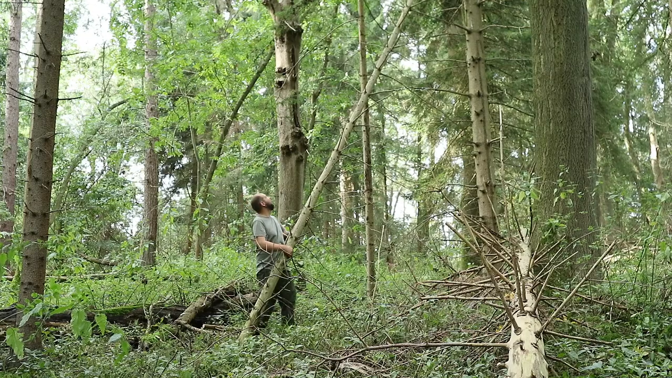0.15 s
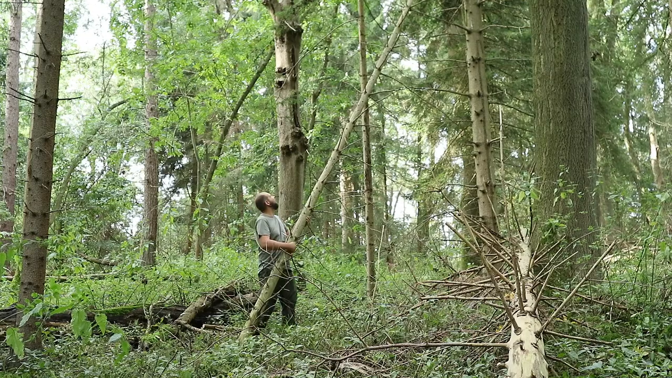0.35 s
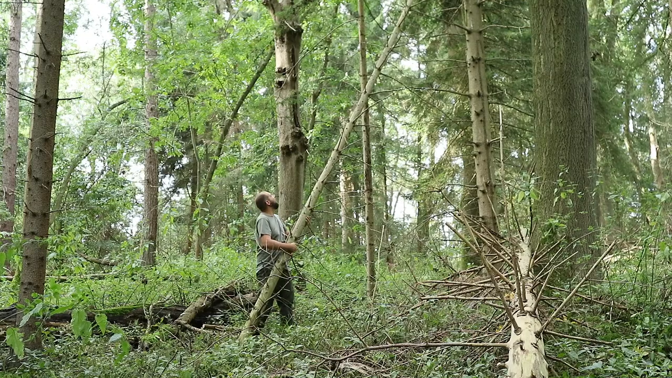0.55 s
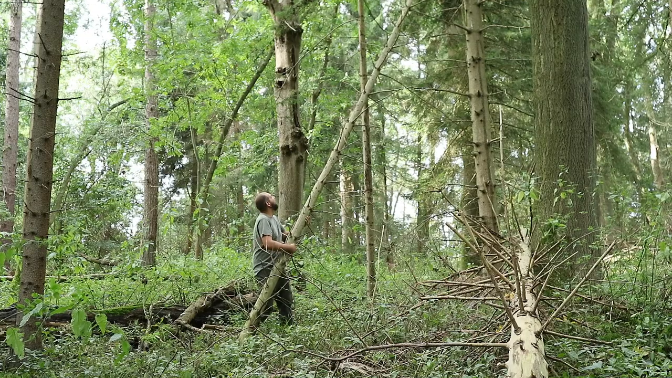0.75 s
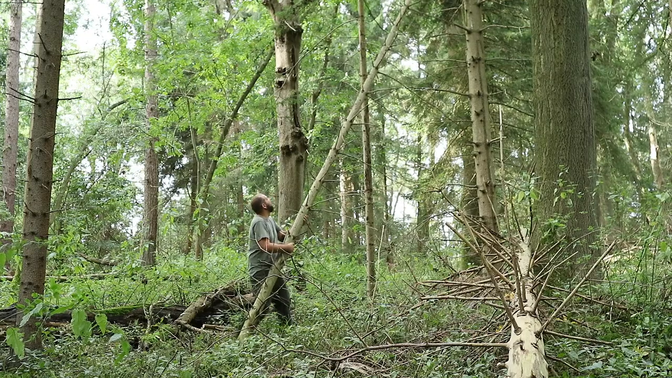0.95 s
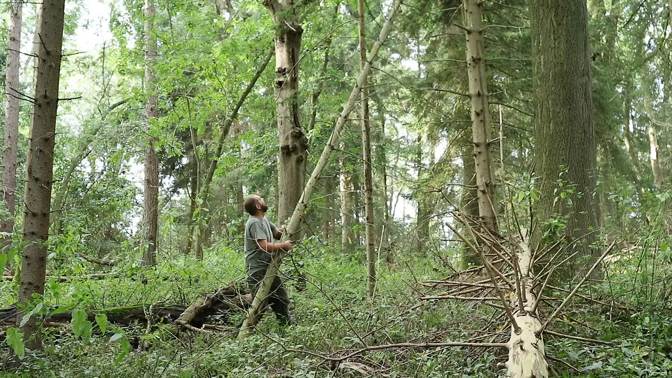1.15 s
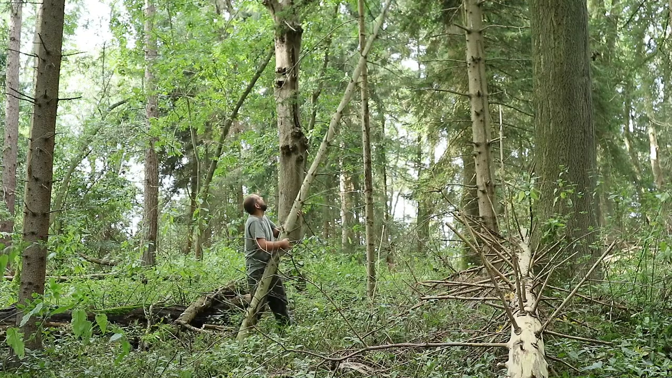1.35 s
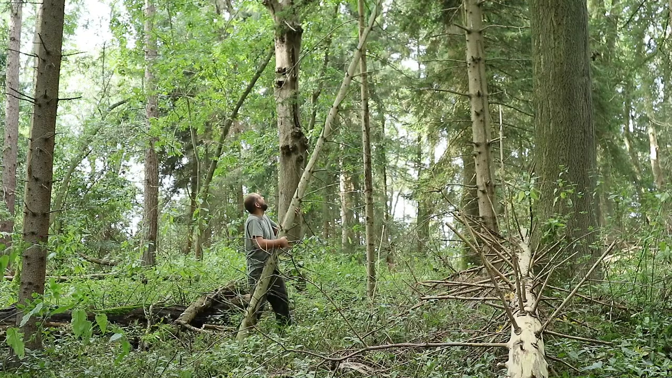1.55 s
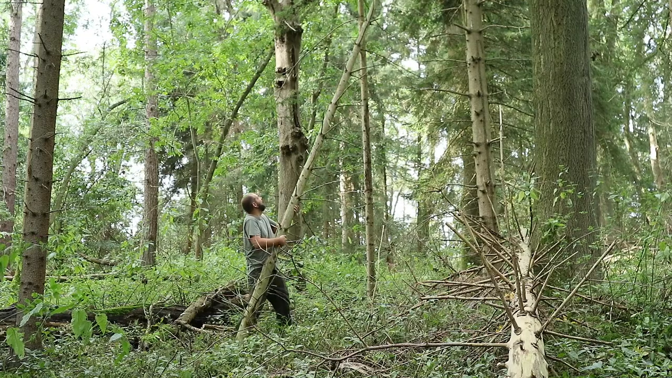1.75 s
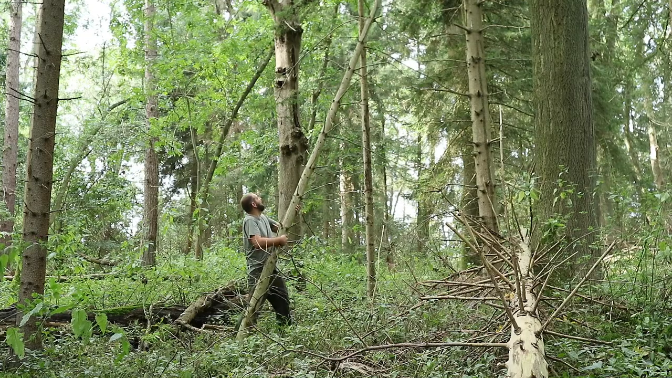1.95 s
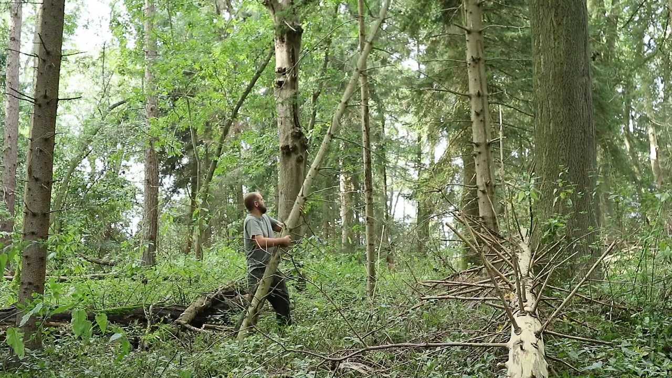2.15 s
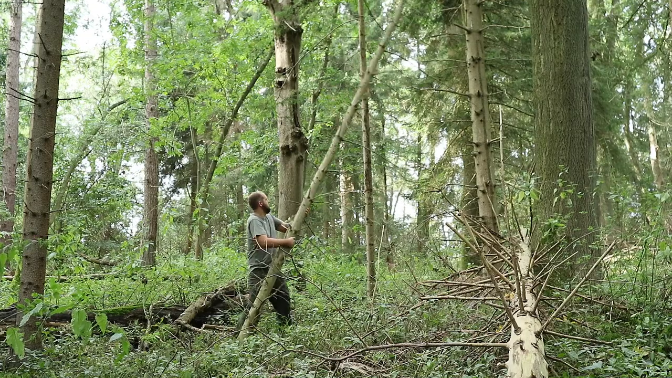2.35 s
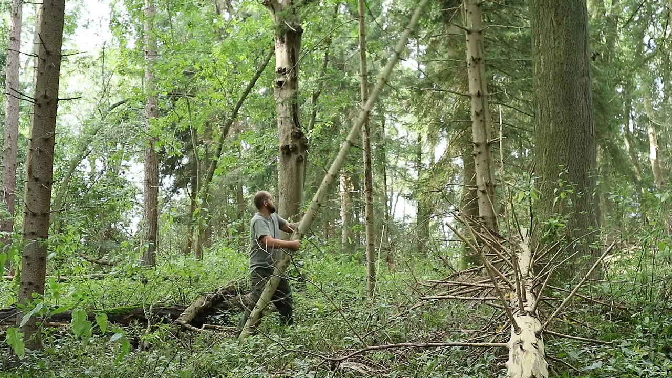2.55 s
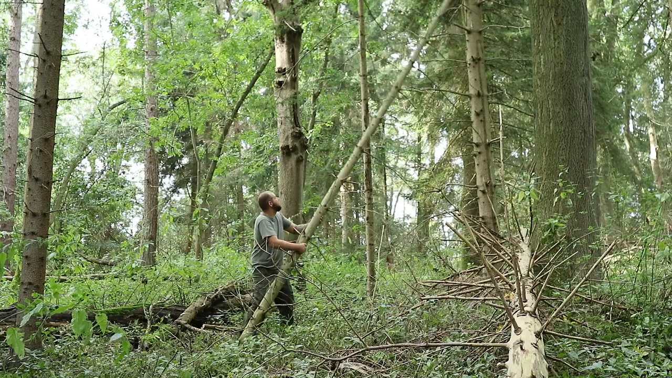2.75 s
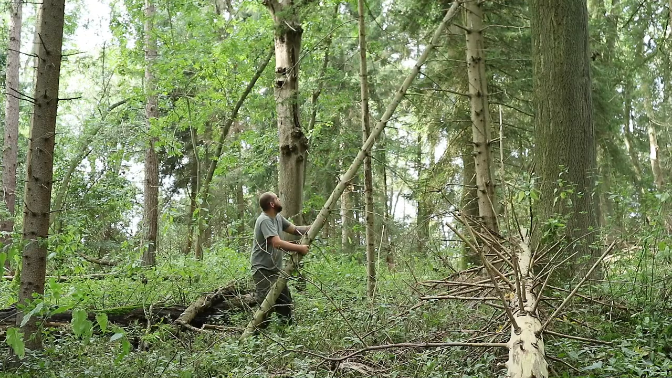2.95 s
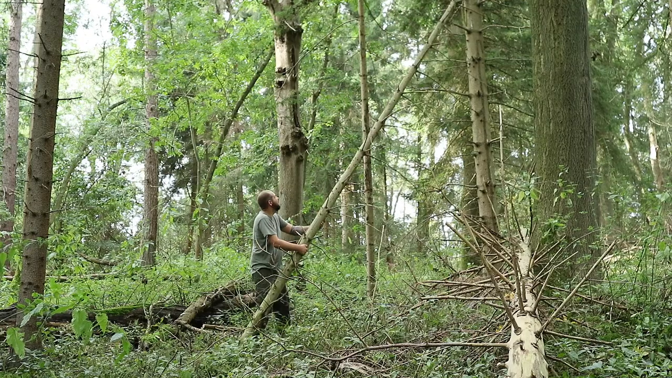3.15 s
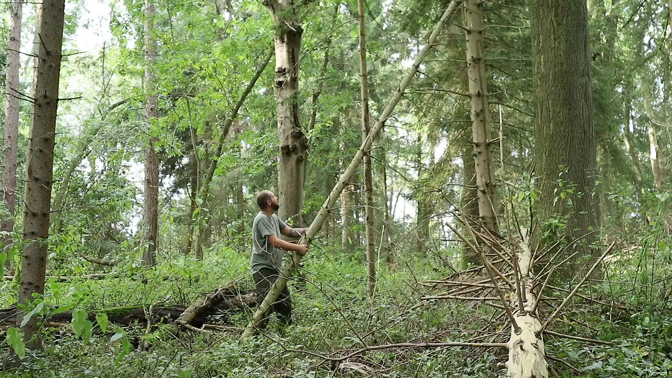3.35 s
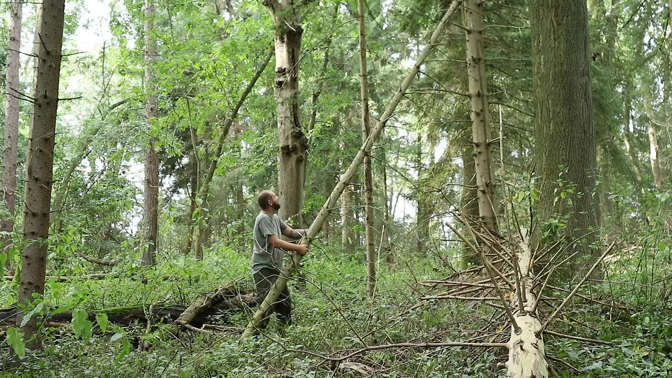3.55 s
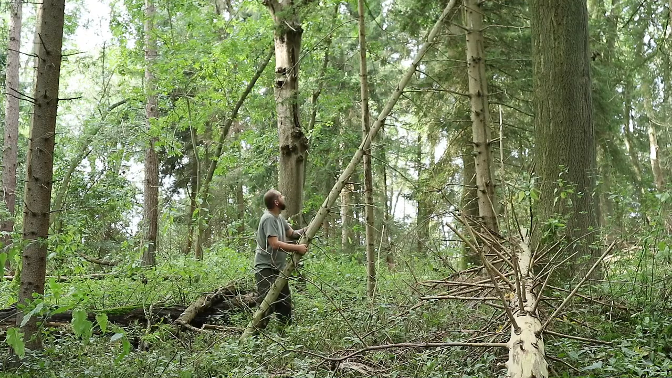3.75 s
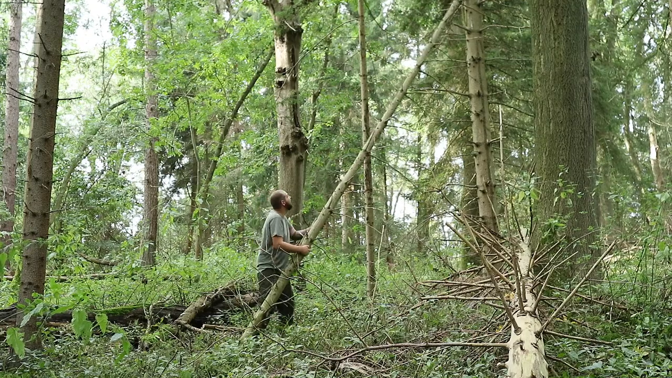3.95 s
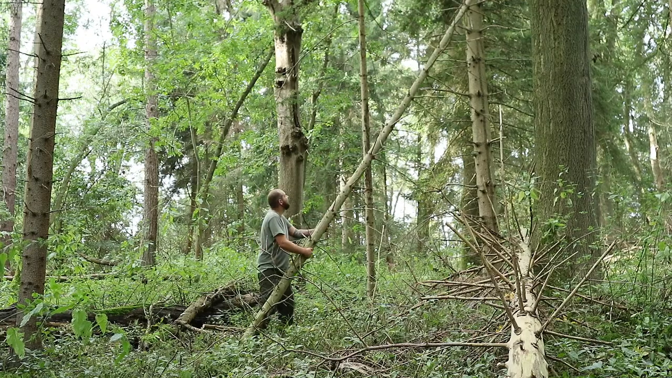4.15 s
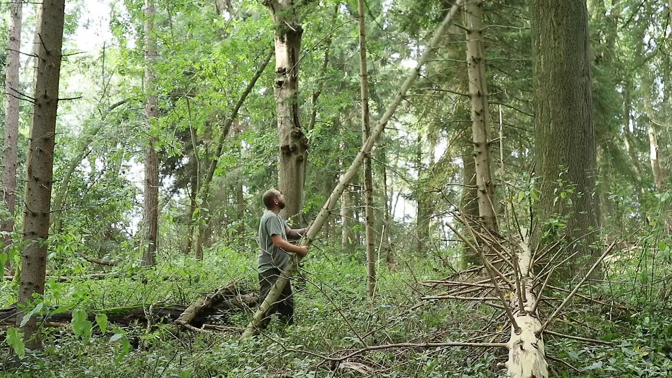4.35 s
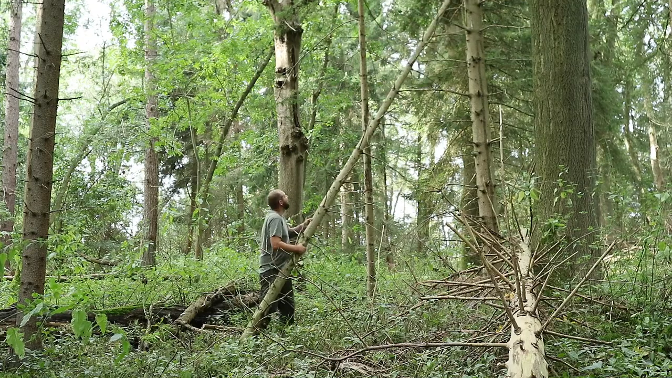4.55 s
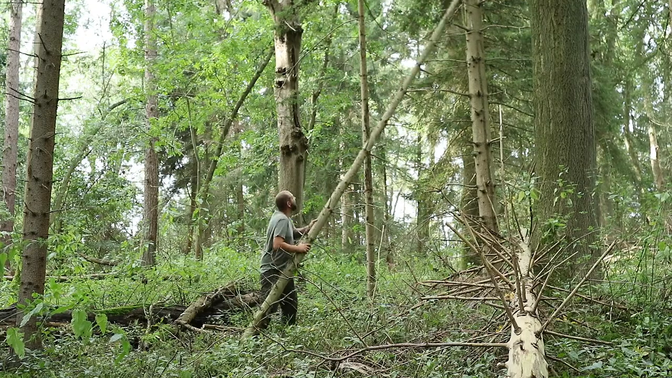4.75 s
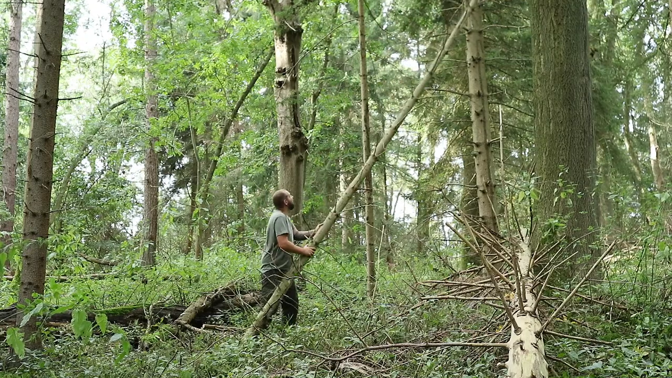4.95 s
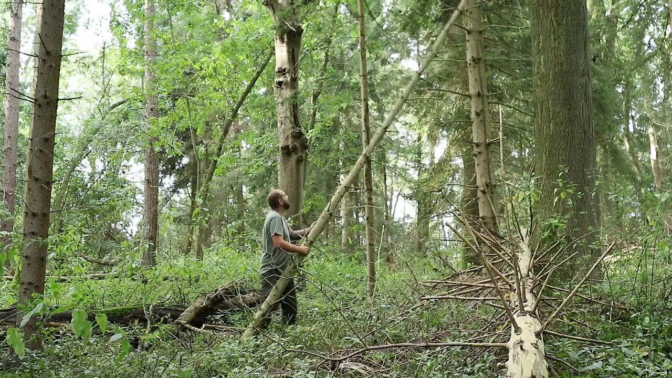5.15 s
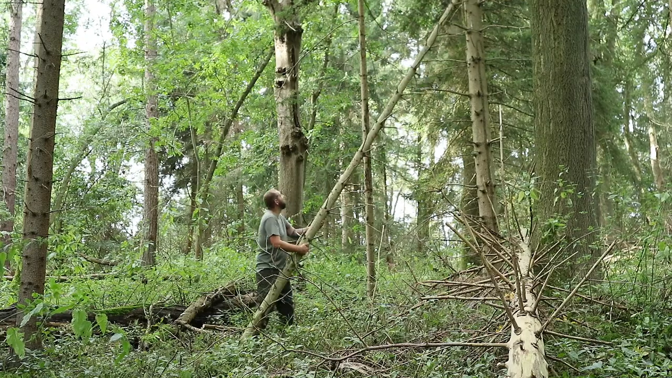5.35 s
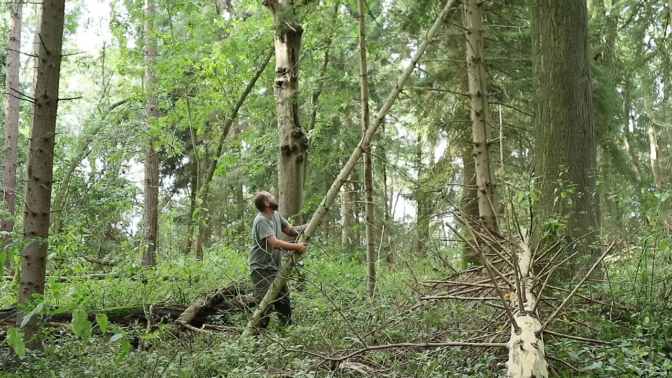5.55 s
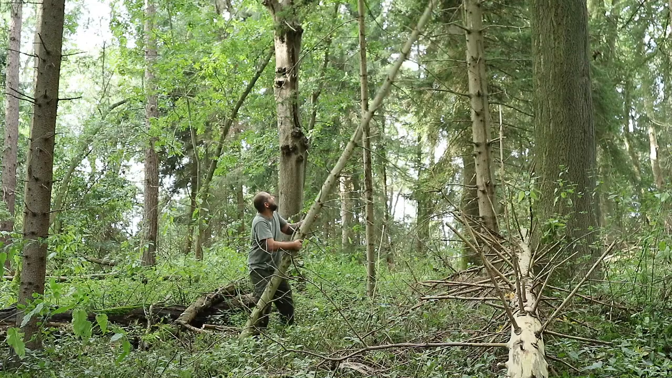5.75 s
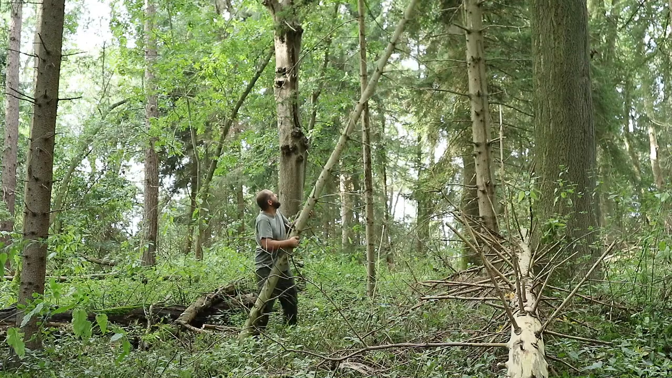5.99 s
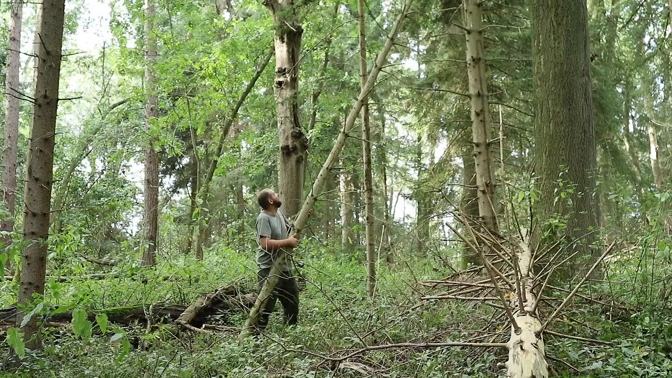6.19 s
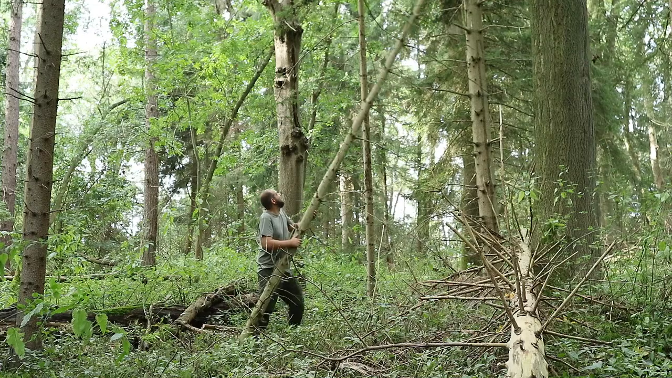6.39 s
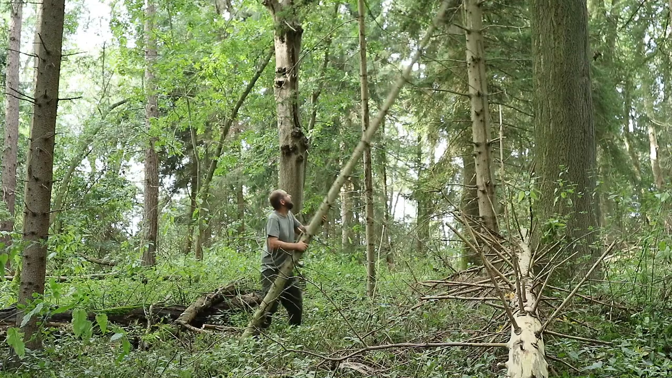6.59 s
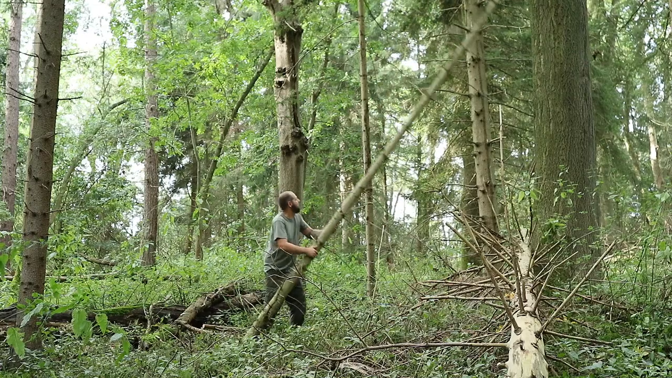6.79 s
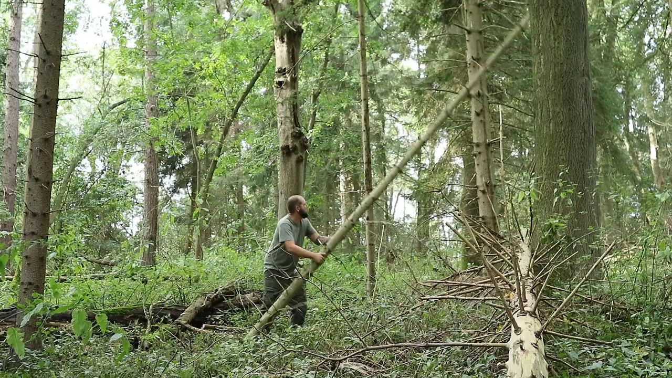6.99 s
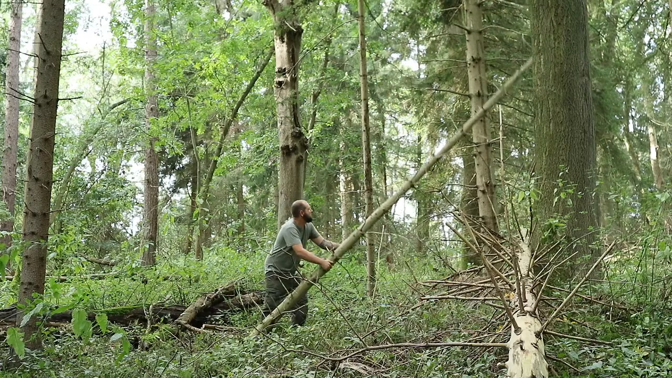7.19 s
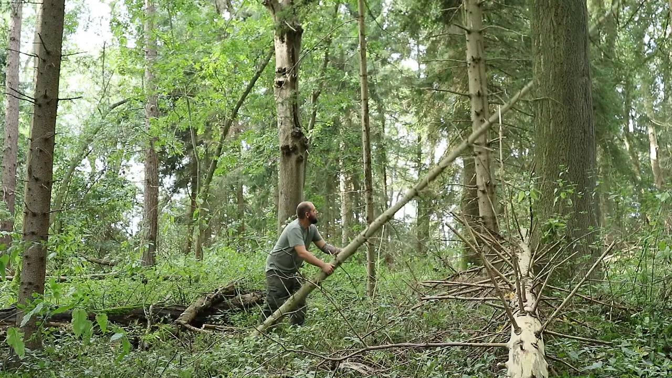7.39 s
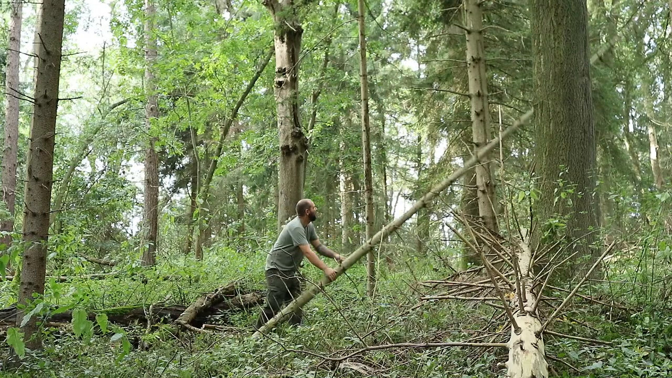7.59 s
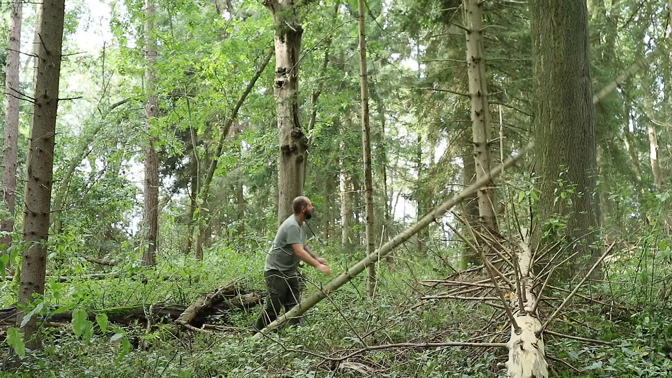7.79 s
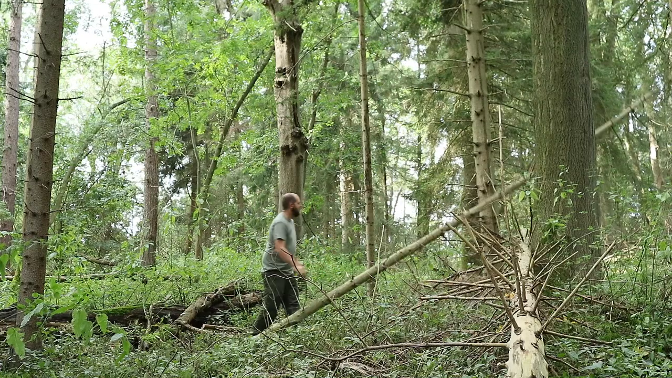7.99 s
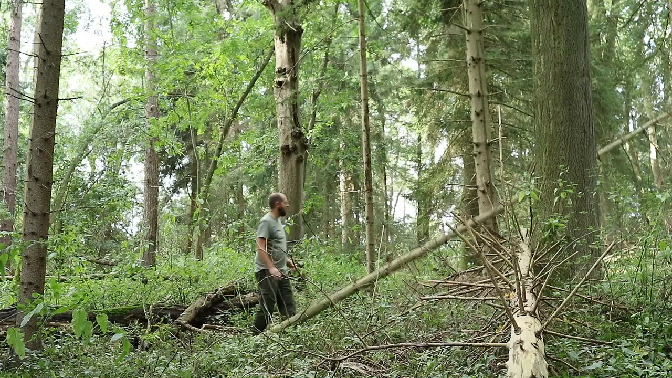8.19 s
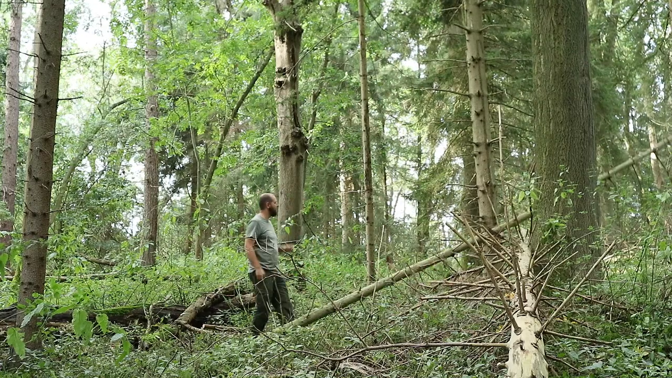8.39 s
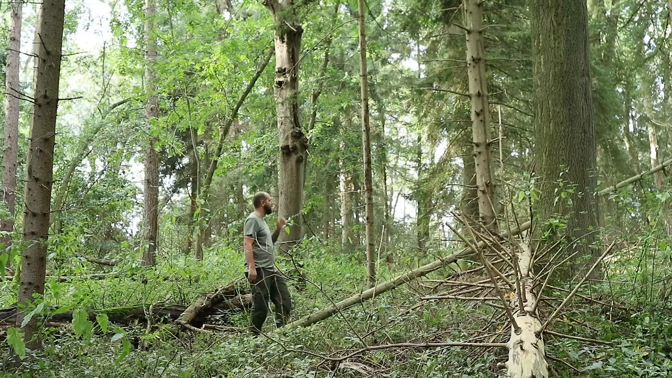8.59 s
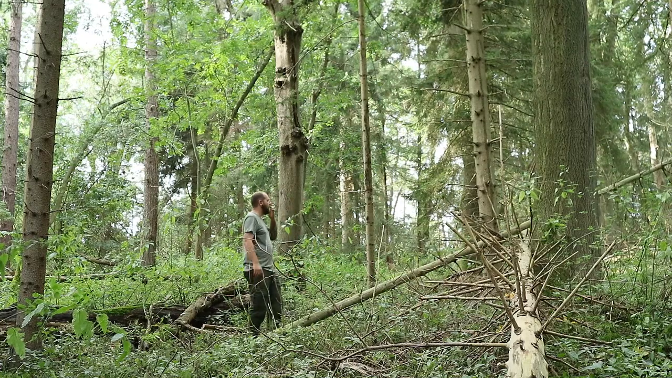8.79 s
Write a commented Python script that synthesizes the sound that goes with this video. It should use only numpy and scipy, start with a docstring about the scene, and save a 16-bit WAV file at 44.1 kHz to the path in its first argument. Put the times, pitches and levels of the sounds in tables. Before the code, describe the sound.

A still woodland with a faint, smooth breeze hiss, heard from several metres away, centred and nearly mono. From 0 to 1 s there is almost nothing but tiny ticks. From 1.2 to 2 s, thin dry snaps and light scrapes come as a dead pine is rocked, with a faint creak near 1.6. Sharper cracks follow at 2.4 and 2.7, then a hard crack and hollow knock at 3.0. After a lull, small snaps at 4.3, a brittle crack near 5.0, dull soft thuds and rubbing until 6. A knock and brief creak at 6.5 begin the fall: continuous needle crackle, twig breaks and woody knocks thicken through 7, with a heavy dull thud at 7.5. Loud splintering peaks between 7.8 and 8.2, then cracks thin at 8.5 and fade by 8.9, each leaving a short, scattered forest echo.

```python
"""Felling a dead pine by hand

A leaning dead pine, straight ahead, is rocked by hand until it gives way and sinks through its neighbours' branches.
Dry limbs snap in bursts of tiny fractures; the trunk creaks, knocks on other stems and thuds as its rotten foot tears.
Twigs and needles crackle as random ticks and short rings over rubbing noise.
The surrounding trunks scatter every sound of the tree into a tail; a light breeze of filtered noise hisses above."""
import sys
import numpy as np
from scipy import signal
from scipy.io import wavfile

SR = 44100
rng = np.random.default_rng(int(sys.argv[2]) if len(sys.argv) > 2 else 0)


def dump_mix(stems):
    """Bounce the given channels to the path in sys.argv[1] as a 16-bit WAV at rate SR."""
    frames = np.atleast_2d(stems).T  # one column per channel
    limited = np.clip(frames, -1, 1)  # hard clip at full scale
    pcm = np.round(limited * 32767).astype(np.int16)
    wavfile.write(sys.argv[1], SR, pcm)


N = 389403
TIME = np.arange(N) / SR
BAND_EDGES = 22 * 2 ** np.arange(0, 10, .5)  # Hz, half octaves
LEVEL_WINDOW_S = .01

# resonances of a struck or rubbed stem: ratio_to_pitch, level_db
STEM_MODES = [(.66, -13.5), (1, 6.5), (1.4, -9.5), (1.9, -19)]


def from_db(db):
    """Decibels to gain."""
    return np.exp(np.asarray(db) * (np.log(10) / 20))


def rms_one(x):
    """Scale to rms 1."""
    return x / np.sqrt(np.mean(x ** 2) + 1e-20)


def at_level(x, db):
    """Scale a short sound so that its energy, spread over the level window, has this rms."""
    return x * from_db(db) * np.sqrt(LEVEL_WINDOW_S * SR / (np.sum(x ** 2) + 1e-20))


def at_hz(points, hz):
    """Read a table on a log-frequency axis."""
    freqs, values = np.transpose(points)
    return np.interp(np.log(hz), np.log(freqs), values)


def band_filter(low_hz, high_hz):
    """Butterworth band-pass sections."""
    return signal.butter(2, [low_hz, min(high_hz, SR / 2 - 1000)], "band", fs=SR, output="sos")


def bands():
    """Half-octave bank: (centre Hz, filter)."""
    return [(np.sqrt(a * b), band_filter(a, b)) for a, b in zip(BAND_EDGES, BAND_EDGES[1:])]


def resonate(x, hz, width_hz):
    """One resonance from a pair of poles, gain 1 at its top."""
    r = np.exp(-np.pi * width_hz / SR)
    zeros = np.array([1, 0, -1]) * (1 - r * r) / 2
    poles = [1, -2 * r * np.cos(2 * np.pi * hz / SR), r * r]
    return signal.lfilter(zeros, poles, x + 1e-18)


def drift(rate):
    """Slow random wander of rms 1, with this many random knots per second."""
    knots = rng.standard_normal(4096)
    return rms_one(np.interp(TIME * rate, np.arange(len(knots)), knots))


def add(track, sound, s):
    """Mix a sound into the track from time s on."""
    start = max(round(s * SR), 0)
    part = sound[:max(N - start, 0)]
    track[start:start + len(part)] += part


def breeze():
    """Far foliage gives a smooth, slightly wavering hiss, almost mono."""
    # colour of the canopy, before overall scaling: freq_hz, relative_level_db_per_hz
    canopy_colour = [(20, -45.5), (30, -21.5), (90, -11.5), (389, -3), (622, 0), (874, -2), (945, -15.5),
                     (1400, 2), (1720, -10), (15500, -26)]
    # chosen stereo width of the hiss: freq_hz, side_to_mid_db
    stereo_width = [(30, -11.5), (90, -19), (250, -12), (550, -22), (3000, -68), (12000, -13.5)]
    level_db, waver_db = -51, 1.4
    out = 0
    for hz, band in bands():
        hiss = signal.sosfilt(band, rng.standard_normal((2, N)))
        mid, side = hiss * from_db(at_hz(canopy_colour, hz) + waver_db * drift(5.5))
        out = out + mid + from_db(at_hz(stereo_width, hz)) * side * [[1], [-1]]
    return from_db(level_db) * rms_one(out)


def forest(x, near_db=-8, near_s=0.00845, build_s=0.00268):
    """Ground and undergrowth answer at once; the trunks further off return a lumpy, fading tail."""
    # strength of the scattered tail: freq_hz, tail_db
    tail_level = [(150, -10.5), (400, -14), (1000, -11.5), (3000, -10), (7500, -8.5), (14000, -9.5)]
    # how long the tail lasts: freq_hz, t60_s
    tail_t60 = [(150, 5.7), (1000, 2.92), (4000, 1.364), (8000, 0.95), (15000, 0.55)]
    lumps_db = 4
    t = np.arange(SR) / SR
    lumps = rng.standard_normal(SR // 64 + 1).repeat(64)[:SR]
    trunks = from_db(lumps_db * lumps * np.exp(-t / .3))
    response = np.zeros(SR)
    for hz, band in bands()[4:]:
        far = trunks * (1 - np.exp(-t / build_s)) * from_db(-60 * t / at_hz(tail_t60, hz))
        near = (t > .002) * np.exp(-t / near_s)
        far_echo = from_db(at_hz(tail_level, hz)) * rms_one(far) * rng.standard_normal(SR)
        near_echo = from_db(near_db) * rms_one(near) * rng.standard_normal(SR)
        response += signal.sosfilt(band, far_echo + near_echo) / np.sqrt(SR)
    return signal.fftconvolve(x, response)[:N]


def gate(start_s, hold_s):
    """A slide swells, holds and dies away exponentially."""
    attack_s, release_s = 0.0296, 0.046
    early = np.maximum(start_s - TIME, 0)
    late = np.maximum(TIME - start_s - hold_s, 0)
    return np.exp(-early / attack_s - late / release_s)


def dragging():
    """Drive levels in dB of rubbing wood and of needles: short scrapes while the tree is rocked, then the long fall."""
    # each push slides the crown along its neighbours: start_s, hold_s, wood_drive_db, needles_drive_db
    pushes = [(1.068, 0.0878, -55, -56.5), (1.29, 0.0164, -44.5, -53), (1.425, 0.3194, -54, -61.5),
              (2.374, 0.0606, -43, -45.5), (2.617, 0.1392, -47, -49.5), (2.864, 0.0457, -43.5, -49),
              (3.043, 0.0661, -45, -48), (3.144, 0.1614, -47, -58), (4.094, 0.42, -53.5, -61),
              (4.402, 0.75, -53.5, -68.5), (5.064, 0.853, -51, -54.5), (5.99, 0.348, -53.5, -55)]
    # the tree sinks through the branches, drive before trim: time_s, wood_drive_db, needles_drive_db
    fall_path = [(6.4, -50, -50.5), (6.62, -47, -47.5), (6.8, -35, -49.5), (6.89, -35.5, -39),
                 (7.07, -35.5, -42), (7.29, -33, -40), (7.81, -38, -45), (8.0, -31, -39), (8.1, -32, -37.5),
                 (8.25, -60.5, -48), (8.5, -38.5, -44.5), (8.62, -34, -45.5), (8.83, -46, -49.5)]
    wood_trim_db, needles_trim_db = -4, -2
    rest_db = [[-63], [-72.5]]  # wood, needles: the crown stirs faintly between pushes
    s, wood, needles = np.transpose(fall_path)
    fall_db = np.array([np.interp(TIME, s, wood) + wood_trim_db,
                        np.interp(TIME, s, needles) + needles_trim_db])
    power = from_db(rest_db) ** 2 + (from_db(fall_db) * gate(s[0], N / SR)) ** 2
    for start, hold, wood_db, needles_db in pushes:
        power = power + (from_db([[wood_db], [needles_db]]) * gate(start, hold)) ** 2
    return 10 * np.log10(power)


def crackle(wood, needles, size_db=0.5, patchy_db=2.5, gain_db=9.0):
    """Twigs and needles tick at random, each around its own pitch, over smoother rubbing; hard dragging ticks more."""
    # colour of the crackle, added to the drive: freq_hz, relative_level_db_per_hz
    crackle_colour = [(150, -55.5), (300, -4), (500, 0), (800, 7.5), (1200, -0.5), (2000, -1.5),
                      (4000, -6.5), (7800, -5), (10500, -7), (15000, -20.5)]
    ticks_per_s, tick_octaves, rub_share = 900, 1.0, .3
    rate = ticks_per_s * from_db(0.46 * (needles + 47.0))
    at = np.flatnonzero(rng.random(N) < rate * from_db(3.5 * drift(45)) / SR)
    sizes = from_db(size_db * np.minimum(rng.exponential(1, N), 4.5))[at] / np.sqrt(rate[at])
    own_hz = rng.choice(BAND_EDGES[5:], N)[at]
    out = np.zeros(N)
    for hz, band in bands()[5:]:
        ticks = np.zeros(N)
        closeness = np.exp(-(np.log2(hz / own_hz) / tick_octaves) ** 2)
        ticks[at] = sizes * closeness * rng.choice([-1, 1], len(at))
        grains = rms_one(ticks) + rub_share * rng.standard_normal(N)
        # thin things sound high: wood drives the low bands, needles the high ones
        fineness = np.clip(np.log(hz / 1100) / np.log(7000 / 1100), 0, 1)
        drive = wood + fineness * (needles - wood)
        level = drive + at_hz(crackle_colour, hz) + patchy_db * drift(35)
        out += signal.sosfilt(band, grains * from_db(level + gain_db))
    return out


def twigs(wood, needles, pitch_hz=1900, pitch_spread=0.669, thin_loss_db=12.5):
    """Small dead twigs break at random as the crown drags past; thin ones ring higher and fainter."""
    per_s, size_db, sharpness, burst_s, gain_db = 70, 2.5, 4.0, .0011, 2.0
    slot_s = .004
    out, t = np.zeros(N), np.arange(1024) / SR
    drag_db = (wood + needles) / 2
    slots = np.arange(0, N / SR, slot_s)
    chances = rng.random((len(slots), 2))
    sizes = rng.standard_normal((len(slots), 2)).clip(-1.4, 1.7)
    bursts = rng.standard_normal((len(slots), len(t)))
    for slot, (chance, delay), (size, thinness), burst in zip(slots, chances, sizes, bursts):
        level = drag_db[int(slot * SR)] + gain_db
        # harder dragging breaks more twigs
        if chance < per_s * slot_s * from_db(.35 * (level + 36)):
            hz = pitch_hz * np.exp(pitch_spread * thinness)
            fracture = burst * np.exp(-t / burst_s)
            snap = resonate(resonate(fracture, hz, hz / sharpness), hz, hz)  # a short, blunt ring
            snap_db = level + size_db * size - thin_loss_db * max(thinness, 0)
            add(out, at_level(snap, snap_db), slot + delay * slot_s)
    return out


def creaks(slips_per_s=300, uneven=0.32, sharpness=3.5, gain_db=0.0):
    """Stems stick and slip on each other: an uneven run of slips swells and fades, ringing the stem."""
    # rubbing stems: start_s, length_s, rms_over_length_db, pitch_hz
    creak_events = [(1.571, 0.18, -55, 1192), (6.01, 0.0485, -51, 1580), (6.501, 0.03075, -38, 806)]
    out = np.zeros(N)
    for s, length, db, hz in creak_events:
        gaps, sizes = rng.standard_normal((2, 64))
        at = np.cumsum(np.exp(uneven * gaps)) / slips_per_s
        inside = at < length
        slips = np.zeros(8192)
        strength = np.sin(np.pi * at / length) * from_db(2 * sizes)
        slips[(at[inside] * SR).astype(int)] = strength[inside]
        rasp = sum(from_db(mode_db) * resonate(slips, hz * ratio, hz / sharpness)
                   for ratio, mode_db in STEM_MODES)
        rasp = signal.sosfilt(band_filter(.6 * hz, 1.7 * hz), rasp)
        add(out, at_level(rasp, db + gain_db) * np.sqrt(length / LEVEL_WINDOW_S), s)
    return out


def knocks(contact_s=0.000397, rebound_s=0.004244, rebound=0.43, ring_on=0.043, ring_on_s=0.0102, gain_db=0.0):
    """One clean contact swings the stem for a few cycles; the wave returns once along it and a faint ring stays."""
    # wood striking wood as the trunk slips and lands: time_s, rms_over_10ms_db, pitch_hz, ring_s
    knock_events = [(1.051, -46.5, 744, 0.0011), (3.0355, -22.5, 782, 0.0029), (6.4172, -38, 1017, 0.00105),
                    (6.421, -33, 1219, 0.00075), (6.4368, -31.5, 891.4, 0.0021),
                    (6.4832, -17.5, 865.5, 0.00098), (6.7009, -25, 1102, 0.00183),
                    (6.708, -24.5, 1263, 0.001907), (6.783, -32, 933.2, 0.00197),
                    (6.828, -29, 1033, 0.00088), (6.8315, -27, 871, 0.0028), (6.8438, -26.5, 1066, .002),
                    (7.202, -29.5, 1193, 0.00216), (8.0091, -20.5, 990, 0.00078),
                    (8.0184, -22.5, 1424, 0.00147), (8.053, -20, 1205, 0.0093),
                    (8.1095, -17.5, 1064, 0.00074), (8.1259, -24, 1204, 0.00203),
                    (8.317, -25.5, 1019, 0.00088)]
    out, t = np.zeros(N), np.arange(4096) / SR
    for s, db, hz, ring_s in knock_events:
        modes = sum(from_db(mode_db) * np.sin(2 * np.pi * hz * ratio * t) for ratio, mode_db in STEM_MODES)
        fade = np.exp(-t / ring_s) + ring_on * np.exp(-t / ring_on_s)
        blow = modes * (1 - np.exp(-t / contact_s)) * fade
        blow = signal.sosfilt(band_filter(.75 * hz, 1.9 * hz), blow)
        return_s = rebound_s * rng.uniform(.85, 1.15)
        blow = blow + rebound * np.interp(t - return_s, t, blow, left=0)
        add(out, at_level(blow, db + gain_db), s)
    return out


def thuds(rise_s=0.00216, decay_s=0.00269, low_edge=0.714, gain_db=0.0):
    """A soft blow swings the wood for a few cycles; rotten fibres tear on dully and the long trunk hums briefly."""
    # dull knocks of the trunk and its foot, without the soil: time_s, rms_over_10ms_db, pitch_hz
    thud_events = [(3.037, -29, 508), (4.944, -35.5, 349), (5.221, -37, 300), (5.263, -42, 286.5),
                   (5.712, -44, 340), (7.378, -40, 454), (7.495, -18.5, 342.3), (7.518, -26.5, 305),
                   (7.564, -35, 277), (7.797, -26.5, 465), (7.97, -28.5, 292.6), (7.992, -30, 347),
                   (8.036, -37, 339.8), (8.072, -30, 338), (8.135, -29.5, 491), (8.654, -37, 290.6)]
    # resonances of the long trunk: freq_hz, width_hz, level_db
    trunk_modes = [(183.4, 10.6, -12.5), (265, 25, 9), (306.9, 10.8, 2)]
    tearing, tearing_s = .14, .016
    # the soil booms under the heaviest thuds; light ones hardly move it
    ground_db, ground_grows, heavy_thud_db = -11, 2.43, -17.5
    ground_band = band_filter(165, 217.4)
    out, t = np.zeros(N), np.arange(8192) / SR
    for s, db, hz in thud_events:
        dull = band_filter(hz * min(low_edge, .9), 2 * hz)
        swing = np.sin(2 * np.pi * hz * t) * np.exp(-t / decay_s)
        fibres = rms_one(signal.sosfilt(dull, rng.standard_normal(len(t))))
        tear = tearing * fibres * np.exp(-t / tearing_s)
        blow = signal.sosfilt(dull, (swing + tear) * (1 - np.exp(-t / rise_s)))
        hum = sum(from_db(mode_db) * resonate(blow, mode_hz, width) for mode_hz, width, mode_db in trunk_modes)
        ground = signal.sosfilt(ground_band, swing)
        boom_db = heavy_thud_db + ground_db + ground_grows * (db - heavy_thud_db)
        add(out, at_level(blow + hum, db + gain_db) + at_level(ground, boom_db), s - .002)
    return out


def break_length(body_db, fibre_db):
    """Decay time of a break in s: tough wood parts slowly, brittle fibres all at once."""
    shortest_s, longest_s, typical_extra_s = .0005, .0055, 0.0043
    toughness = 0.3536 * (body_db + 33) - 0.5343 * (fibre_db + 37)
    return min(shortest_s + typical_extra_s * np.exp(toughness), longest_s)


def cracks(stray=0, rise_share=0.425, fall_share=0.829, uneven_db=3.0, detune=0.0706,
           wood_db=0.0, splinter_db=-3.0, fibre_db=-2.0, splinter_ring=1.324, splinter_width_hz=380,
           fibre_hz=8000, fibre_ring=1.165, ground_s=.0007, ground_share=0.614):
    """A limb fails in an avalanche of fractures lasting a few ms, which rings its body, splinters and fibres."""
    # snapping limbs, rms over 10 ms before the trims above: time_s, body_db, splinter_db, fibre_db, pitch_hz
    snaps = [(0.2675, -50.5, -57, -47.5, 1440), (0.407, -49.5, -57.5, -43, 920),
             (0.904, -54.5, -43.5, -44.5, 1835), (1.2696, -56.5, -34.5, -36.5, 1930),
             (1.2906, -35.5, -33.5, -50.5, 1403), (1.4036, -38.5, -42, -62.5, 1089),
             (1.4322, -61, -44.5, -49.5, 1830), (1.4738, -45, -30.5, -32.5, 1137),
             (1.6803, -38, -41, -38, 1223), (1.7429, -42.5, -45.5, -45, 1258),
             (1.8583, -47.5, -46.5, -42.5, 1043), (1.9085, -37, -38.5, -39.5, 1315),
             (1.9213, -36, -38.5, -44, 1339), (2.1427, -46, -41, -43, 1156),
             (2.3614, -40.5, -39.5, -37, 820), (2.3821, -34, -29.5, -27.5, 1167),
             (2.604, -40.5, -48.5, -45, 1000), (2.633, -50.5, -56, -39.5, 1279),
             (2.6867, -36.5, -30, -34.5, 1050), (2.7151, -48.5, -41, -33.5, 1060),
             (2.7637, -60.5, -55, -41.5, 950), (2.8305, -65, -60.5, -41.5, 1091),
             (2.8862, -42, -51.5, -50, 1322), (3.0396, -29.5, -23.5, -24, 1706),
             (3.1726, -29.5, -28.5, -43, 978.3), (3.2343, -44, -40.5, -58, 1023),
             (3.2878, -39, -41, -53.5, 952), (3.4303, -41, -43.5, -50, 1680),
             (4.282, -32.5, -44, -27, 911.5), (4.2923, -33, -39.5, -48, 865),
             (4.3517, -34, -36.5, -51, 1478), (4.6003, -45, -46.5, -58, 909),
             (4.9014, -37, -46.5, -54.5, 789), (4.958, -32, -22.5, -29.5, 1030),
             (5.0568, -47, -55, -61.5, 1319), (5.1126, -37.5, -35.5, -47.5, 1061),
             (5.1385, -72.5, -57, -42, 965), (5.2274, -34.5, -37.5, -52.5, 1005),
             (5.2759, -41, -48, -49.5, 1188), (5.375, -43.5, -44.5, -54.5, 1680),
             (5.447, -44.5, -43, -46.5, 1608), (5.5069, -42.5, -38, -45, 1140),
             (5.582, -36, -44, -30.5, 798.4), (5.79, -35, -49.5, -54, 1362), (6.0473, -35, -44, -46, 1574),
             (6.1673, -58, -44, -54, 877.7), (6.271, -57.5, -36.5, -61, 870.6),
             (6.3276, -49.5, -50, -42, 940), (6.4235, -34, -41.5, -36.5, 1139),
             (6.484, -29, -40.5, -22, 1253), (6.5671, -38, -43.5, -41, 1036),
             (6.7037, -23, -29, -24.5, 1100), (6.8993, -32, -30.5, -26.5, 1075),
             (6.9149, -28.5, -30, -39.5, 865.8), (6.943, -24.5, -27, -44.5, 1038),
             (6.9576, -30, -22, -32, 1245), (7.0253, -31.5, -39, -46, 1122),
             (7.0708, -34.5, -38, -35.5, 1513), (7.0814, -33, -42, -32, 1350),
             (7.1637, -28.5, -30.5, -39, 1593), (7.2151, -31, -38, -36.5, 1330),
             (7.2787, -41.5, -36, -36, 1099), (7.2918, -33.5, -26, -36.5, 1325),
             (7.3493, -32.5, -33, -40, 1358), (7.3592, -28, -37.5, -43.5, 1406),
             (7.4429, -36, -36.5, -50, 1469), (7.4642, -36.5, -27.5, -31.5, 1753),
             (7.5071, -23, -16, -20.5, 1021), (7.526, -22, -29, -36, 1298),
             (7.5365, -30, -27.5, -33.5, 1054), (7.5519, -36.5, -29, -35, 1014),
             (7.605, -34, -29.5, -26, 1022), (7.6373, -39, -51.5, -51.5, 1300),
             (7.6872, -63.5, -55.5, -31.5, 931), (7.7475, -29.5, -29, -36.5, 784.5),
             (7.807, -30, -17.5, -17.5, 1166), (7.8101, -18, -20, -25.5, 1183),
             (7.831, -27, -20.5, -31, 1070), (7.8748, -38, -30, -37, 1200),
             (7.9147, -35, -27, -40.5, 935.1), (7.9697, -28, -27.5, -21, 1730),
             (8.0093, -23.5, -26.5, -30, 1135), (8.0961, -45, -37, -32.5, 1640),
             (8.1113, -24.5, -22, -23, 728), (8.1331, -20, -19.5, -25.5, 1044),
             (8.1518, -52, -31, -33, 1083), (8.1795, -19.5, -13, -22, 1495),
             (8.2224, -33, -29.5, -25.5, 1357), (8.322, -30, -28, -26, 1038),
             (8.395, -46, -53.5, -36, 1140), (8.414, -33, -42, -46.5, 1300),
             (8.4818, -30.5, -26.5, -29.5, 1580), (8.4989, -34, -24, -17.5, 1059),
             (8.6372, -37, -42, -33, 1167), (8.6587, -35, -39, -37.5, 1020),
             (8.7858, -44.5, -45, -40, 1442)]
    # resonances of a dry limb: ratio_to_pitch, width_hz, level_db
    limb_modes = [(.62, 168, 1.5), (.86, 137, 4), (1.04, 140, 6.5), (1.28, 190, 2), (1.6, 307, -1.5)]
    splinter_ratio = 2.36  # the limb's next bending mode, as a multiple of its pitch
    out, lead = np.zeros(N), .012
    t = np.arange(2048) / SR - lead
    wood_band = band_filter(660, 2600)
    splinter_band, fibre_band = band_filter(1744, 5053), band_filter(4540, 12280)
    for s, body, splinter, fibre, pitch in snaps:
        length = break_length(body, fibre)
        pitch = pitch * np.exp(stray * rng.standard_normal())
        age = np.where(t < 0, -t / rise_share, t / fall_share) / length
        fractures = rng.standard_normal((3, len(t))) * from_db(uneven_db * rng.standard_normal(len(t)))
        # the wood strains before it parts
        push = fractures[0] * np.exp(-np.abs(t) / (fall_share * length))
        wood = 0
        for k, (ratio, width, db) in enumerate(limb_modes):
            mode_hz = pitch * ratio * np.exp(detune * rng.standard_normal())  # no two limbs have quite the same shape
            wood = wood + (-1) ** k * from_db(db) * resonate(push, mode_hz, width)
        wood = signal.sosfilt(wood_band, wood)  # a thin limb radiates little bass
        # the avalanche holds briefly, then dies; its bounce off the ground lags by the limb's height
        bursts = fractures[1:] * np.exp(-np.hypot(1, age)) + 1e-18
        lag = round(ground_s * SR * rng.uniform(.5, 2))
        bursts = bursts + ground_share * np.roll(bursts, lag, axis=1)
        shards = signal.sosfilt(splinter_band, bursts[0])
        shards = shards + splinter_ring * resonate(shards, splinter_ratio * pitch, splinter_width_hz)
        fibres = signal.sosfilt(fibre_band, bursts[1])
        ring_hz = fibre_hz * np.exp(detune * rng.standard_normal())
        fibres = fibres + fibre_ring * resonate(fibres, ring_hz, 1440)
        snap = at_level(wood, body + wood_db) + at_level(shards, splinter + splinter_db)
        add(out, snap + at_level(fibres, fibre + fibre_db), s - lead)
    return out


def scene(count=3, crack_echo_db=0.0):
    """The tree stands straight ahead. A break radiates differently in each direction, so its echoes lose its colour."""
    echo_stray = .22  # spread in log pitch between directions
    wood, needles = dragging()
    rest = thuds() + knocks() + creaks() + twigs(wood, needles) + crackle(wood, needles)
    echoes = sum(forest(cracks(stray=echo_stray, ground_share=0)) for direction in range(count))
    crack_echoes = from_db(crack_echo_db) * echoes / np.sqrt(count)
    return cracks() + crack_echoes + rest + forest(rest) + breeze()


def record(dry, dip=0.571, hiss_db=-88):
    """The microphone has a dip in the upper treble; each channel adds faint hiss, peaks are rounded, the top is cut."""
    headroom, cutoff_hz = 1.1, 16000
    x = dry - dip * resonate(dry, 10155, 3660)
    x = x + from_db(hiss_db) * rng.standard_normal((2, N))
    rounded = headroom * np.tanh(x / headroom)
    return signal.sosfilt(signal.ellip(10, .1, 70, cutoff_hz, fs=SR, output="sos"), rounded)


dry = scene()
out = record(dry)
dump_mix(out)
```